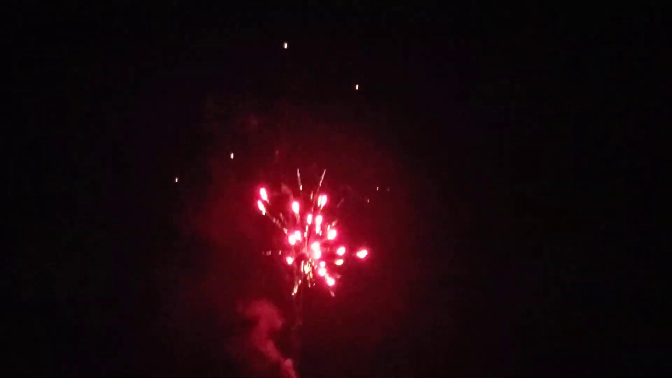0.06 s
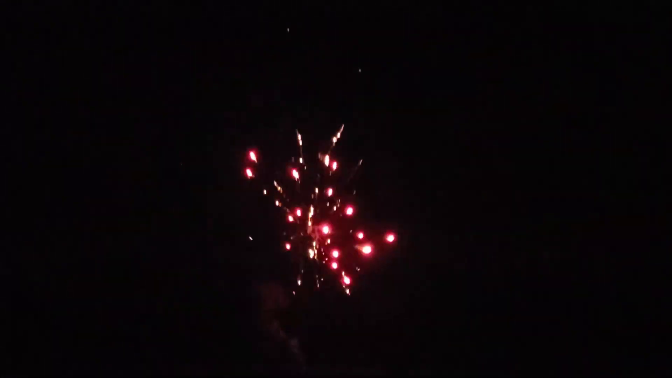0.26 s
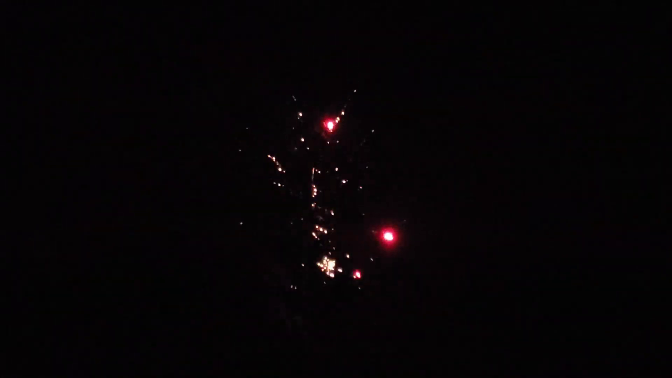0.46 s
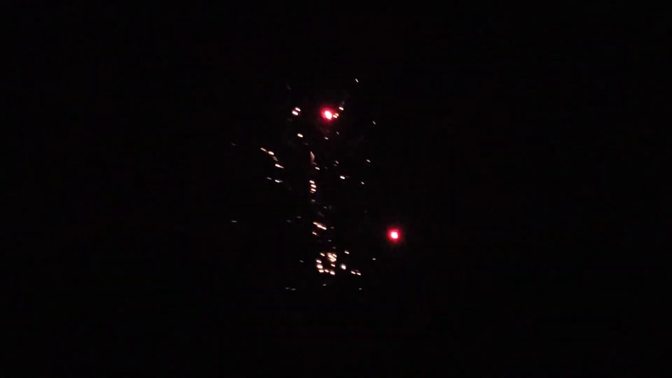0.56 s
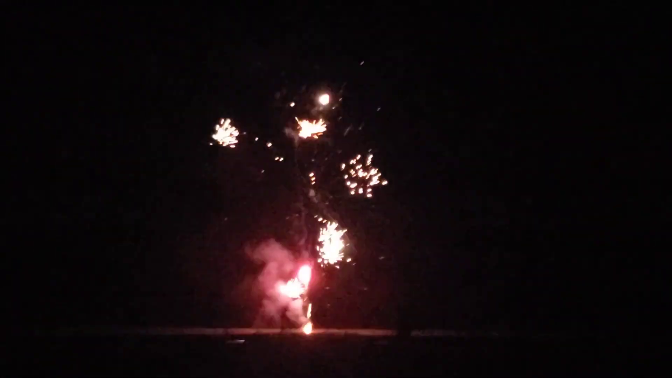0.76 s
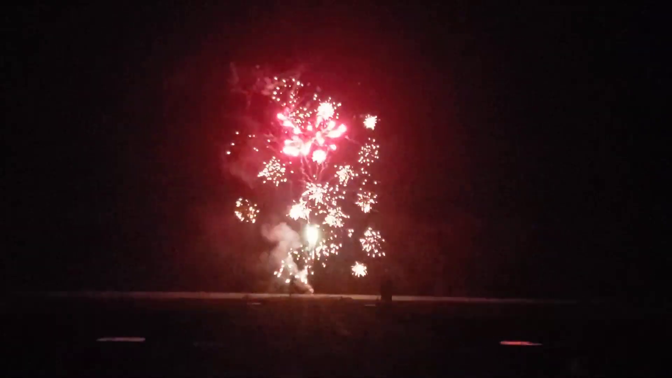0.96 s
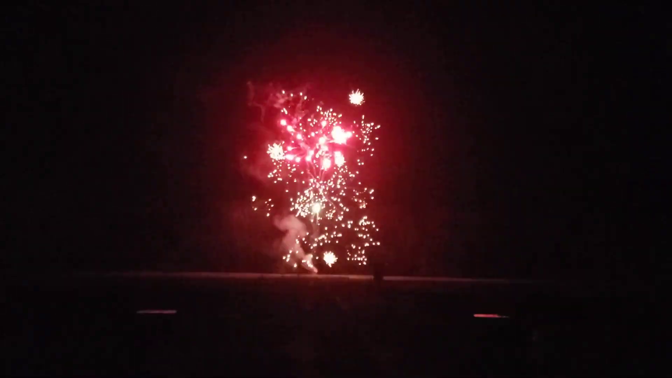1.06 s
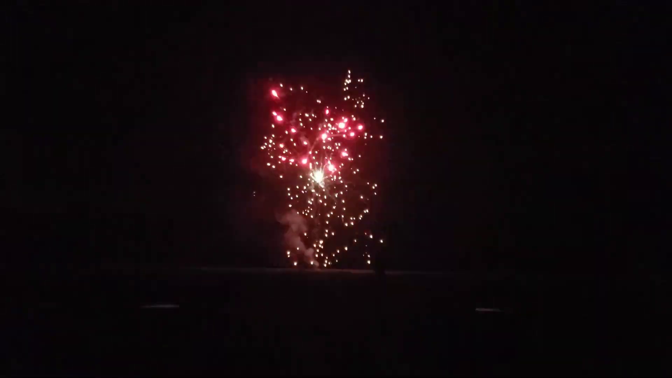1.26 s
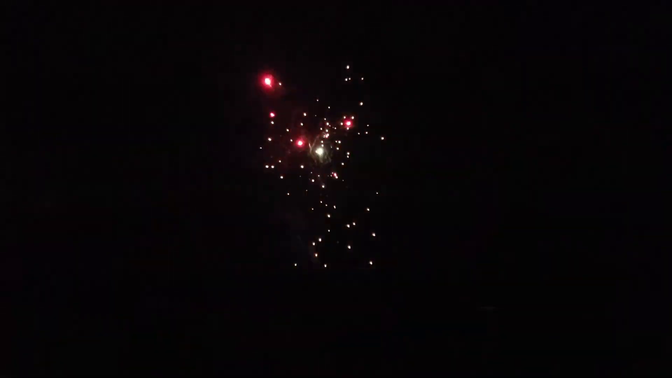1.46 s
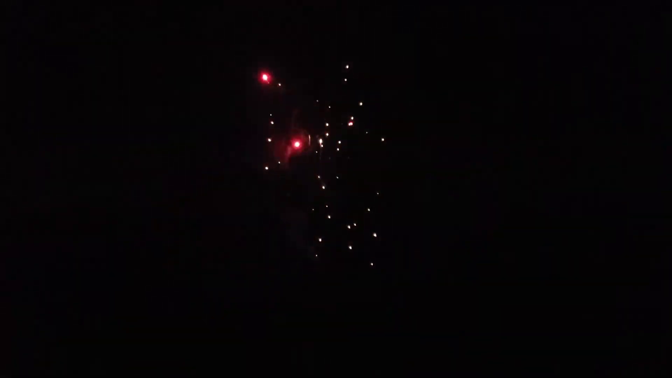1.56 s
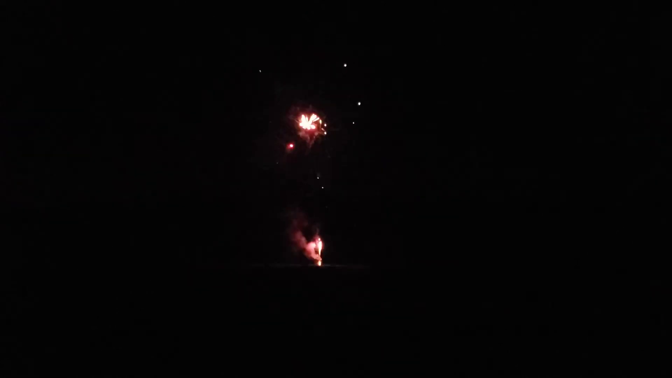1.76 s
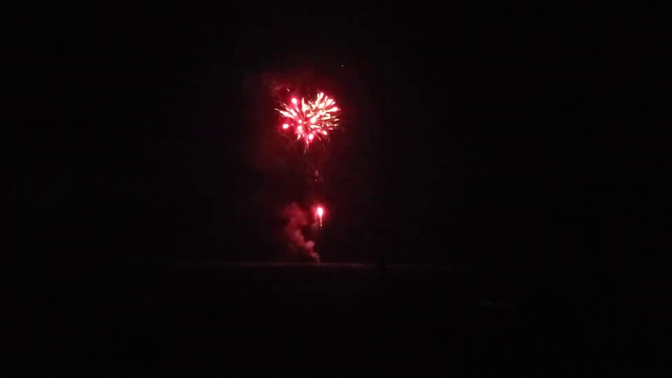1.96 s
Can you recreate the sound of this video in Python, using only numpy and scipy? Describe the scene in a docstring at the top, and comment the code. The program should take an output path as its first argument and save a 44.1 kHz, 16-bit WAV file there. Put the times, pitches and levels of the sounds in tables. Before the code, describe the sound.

Two sharp firework bangs about a second apart, each answered by a hissing wash from distant trees; the second leads into rapid dry crackling. Quiet night air, camera hiss, right channel distorting, left dull.

```python
"""Two shells bang, a lift charge thuds and crackling stars snap in a quick volley: small fireworks, open field, night.
Each report is a pressure spike arriving directly, off the ground and off nearby walls, with a short noise tail.
A third of a second after a bang, distant trees return it as a long hissing wash, made of shaped noise.
Soft low thuds, open air and a faint trill lie beneath, with the camera's own pulsing treble hiss.
The bangs overload the camera's right microphone; the left one is muffled."""
import sys
import numpy as np
from scipy import signal
from scipy.fft import rfft, irfft, next_fast_len
from scipy.io import wavfile
from scipy.ndimage import map_coordinates

SR = 44100
rng = np.random.default_rng(int(sys.argv[2]) if len(sys.argv) > 2 else 0)


def master_out(mix):
    """Clip the mix to full scale and print it as 16-bit PCM to the path in sys.argv[1]."""
    frames = np.transpose(np.atleast_2d(mix))
    ceiling = np.clip(frames, -1, 1)
    pcm = np.round(ceiling * 32767).astype(np.int16)
    wavfile.write(sys.argv[1], SR, pcm)


N = 88200
T = np.arange(N) / SR  # seconds

# Shell bursts: (time [s], level [dB], ground echo delay [ms], ground echo level [dB],
#                microphone thump level [dB], thump frequency [Hz])
SHELLS = [(0.2313, 3, 1.174, -6.5, -3, 57.6), (1.1563, 2, 2.6, -9.5, -10, 64)]
# Lift charge: (time [s], level [dB], ground echo delay [ms], ground echo level [dB])
LIFTS = [(1.0344, -15.5, 0.21, -9)]
# Crackling stars, and at 1.1696 s a strong wall echo of the second shell's bang:
# (time [s], level [dB], ground echo delay [ms], ground echo level [dB])
STARS_AND_ECHO = [(.1095, -10.5, 1.7, -11), (.5105, -27, .9, 2), (.842, -21, 1.2, -12),
                  (1.0669, -11.5, 1.38, -1.5), (1.1642, -14.5, 0.72, -12), (1.1696, -3, 1.1, -16),
                  (1.1816, -9.5, 1.2, -10), (1.2172, -16.5, 1.44, 8.5), (1.2221, -15.5, 1.93, 7),
                  (1.2497, -14, 0.73, 3), (1.2691, -8, 0.98, -5), (1.2739, -16.5, 0.99, -10),
                  (1.2791, -12, 1.05, -13), (1.2871, -10.5, 1.27, -11), (1.2892, -12.5, 1.6, -13),
                  (1.3223, -7.5, 1.45, -6), (1.3251, -16, 0.86, -8), (1.3323, -16, 2.1, 2),
                  (1.3399, -11, .8, -14), (1.3462, -14, 1.7, 4.5), (1.3572, -16, 2.04, 9),
                  (1.3661, -13, 1.12, 4.5), (1.3736, -12, 0.64, 0), (1.3897, -10.5, 1.35, -20),
                  (1.4056, -7, 1.6, -8), (1.4204, -13, 2.1, -1), (1.4301, -12.5, 1.43, 2.5),
                  (1.4394, -13.5, 1.2, 0), (1.4581, -9, 1.96, 1), (1.4868, -9.5, 1.65, -10),
                  (1.4972, -11.5, 2.2, 5.5), (1.508, -12.5, 1.7, -13)]
# Colour of each kind of report: (frequency [Hz], level [dB])
STAR_TONE = [(40, -17), (120, -7.5), (380, -3.5), (520, -10), (800, 5), (1150, 0), (1900, 1), (2400, 0.5),
             (3000, -4), (4200, 0.5), (5500, -7), (6600, -11), (8000, -28.5), (10000, -26), (15000, -32)]
SHELL_TONE = [(10, -61), (50, -24.5), (150, -2), (330, -3), (480, -3.5), (750, 2.5), (1100, -1.5),
              (1550, -9), (2000, -18.5), (3000, -14), (4300, -11.5), (5600, -13), (8000, -39), (10500, -32),
              (15000, -36)]
LIFT_TONE = [(10, -37), (40, -28), (90, -6), (220, 3), (380, -3), (700, -14), (1500, -17), (4300, -12.5),
             (6500, -21.5), (8000, -41), (10000, -30), (15000, -52)]
# Echoes off nearby walls: (delay [s], level [dB])
WALLS = [(0.012, -27.5), (0.0181, -13.5)]
# The trees' answer to a bang: (time after the bang [s], body level [dB], hiss level [dB])
TREES = [(.32, -26, -18), (0.335, -7.5, 9), (0.363, -7.5, 3.5), (.39, -8, -1.5), (.44, -0.5, 1.5),
         (.51, 0.5, 1.5), (.63, 0, -3.5), (.74, 1.5, -7.5), (.85, -4, -20), (1.1, -6, -21),
         (1.6, -36, -12.5)]
# What the trees answer, an earlier burst, both shells and the volley:
# (time [s], body level [dB], hiss level [dB]), added to the levels in TREES
ANSWERED = [(-0.6, -50.5, -50), (.2311, -38, -46), (1.1563, -40.5, -47), (1.33, -44.5, -53)]
# Colour of the trees' dull body and bright hiss: (frequency [Hz], level [dB])
TREE_BODY = [(50, -24), (160, -17.5), (300, -4.5), (550, -4.5), (800, 3.5), (1100, 1), (1700, -16),
             (3000, -17.5), (8000, -70)]
TREE_HISS = [(300, 1), (1300, -2.5), (2300, 3.5), (3100, -1.5), (4300, 1.5), (5700, -6), (7000, -13.5),
             (8000, -30.5), (10000, -22.5), (15000, -30)]
# Colour of the bright, short noise tail after each bang: (frequency [Hz], level [dB])
BRIGHT_TAIL = [(1000, -8), (2500, 2), (4500, 1), (6500, -2), (8000, -14), (10000, -12), (15000, -18)]
# Soft low echoes: (time [s], level [dB], pitch [Hz], time to fall 60 dB [s])
THUDS = [(-.004, -40.5, 270, 0.083), (0.379, -45.5, 115, 0.15), (.564, -43, 400, 0.23)]
# Colour of the steady outdoor air: (frequency [Hz], level [dB])
AIR = [(25, -8), (60, 3), (150, -7), (400, 1.5), (550, -4), (850, 4), (1200, -4), (1800, -5.5), (3000, -10),
       (4000, -8.5), (5500, -13), (7000, -24.5), (8000, -40), (15000, -31)]
# How alike diffuse sound is at the two microphones: (frequency [Hz], likeness [0 to 1])
ALIKE = [(60, 0.92), (140, 0.92), (300, 0.84), (700, 0.11), (1500, 0.082), (6000, .05)]
# Colour of the camera's electronic hiss: (frequency [Hz], level [dB])
SELF_NOISE = [(7500, -48), (9000, -25), (10500, -11), (11600, -12.5), (12300, 5), (13000, 3), (13600, -4),
              (14800, 0.5), (16000, -10.5)]
# Response of the muffled left microphone: (frequency [Hz], level [dB])
LEFT_MIC = [(60, -1), (200, -2.5), (500, -1.5), (800, -5.5), (1200, -1), (1800, -3.5), (2700, -13),
            (4200, -21), (6400, -22.5), (9000, -14.5), (12500, -19.5), (15000, -25)]

SCATTER_DB, SCATTER_T60_S = 0.5, 0.016  # things close to the camera smear each report
NEAR_DB, NEAR_T60_S = -15.5, 0.13  # the yard's short tail after a star
BOOM_DB, BOOM_T60_S, BOOM_HZ = -2, 0.11, 900  # the dull tail after a shell
# low swing of an overloaded microphone
THUMP_DELAY_S, THUMP_WIDTH_S, THUMP_Q, THUMP_LEFT_DB = 0.00073, 0.00087, 2.53, -14
BRIGHT_TAIL_DB, BRIGHT_TAIL_T60_S = -39, 0.3
AIR_DB = -50
INSECT_HZ, INSECT_WIDTH_HZ, INSECT_DB, INSECT_FADE_DB_PER_S = 3610, 79, -58, 18
SELF_NOISE_DB, BUZZ_HZ = -57, 62.925
# bursts of hiss: places and width as fractions of a cycle, and the steady part beside bursts of 1
BUZZ_PLACES, BUZZ_WIDTH, BUZZ_STEADY = (0.22, 0.63), 0.075, 0.35
LEFT_LAG_S, LOW_CUT_HZ, TOP_HZ = 0.0001, 21, 16100
CLIP_TOP = 1.3  # ceiling that an overloaded signal approaches


def amp(db):
    """Decibels to gain."""
    return 10 ** (np.asarray(db) / 20)


def along(points, hz):
    """Read (frequency, value) points on a log frequency axis."""
    f, v = np.transpose(points)
    return np.interp(np.log(hz + 1), np.log(f + 1), v)


def filtered(x, response):
    """Multiply the spectrum of x by a response of frequency."""
    m = next_fast_len(x.shape[-1] + SR // 4)
    spectrum = rfft(x, m) * response(np.fft.rfftfreq(m, 1 / SR))
    return irfft(spectrum, m)[..., :x.shape[-1]]


def causal(points, size=4096):
    """The sharpest causal impulse response of this colour (minimum phase)."""
    log_gain = np.log(amp(along(points, np.fft.rfftfreq(size, 1 / SR))))
    cepstrum = irfft(log_gain)
    cepstrum[1:size // 2] *= 2  # fold the time-reversed half forward
    cepstrum[size // 2 + 1:] = 0
    return irfft(np.exp(rfft(cepstrum)))[:size // 2]


def add(track, s, sound):
    """Mix a sound in at time s."""
    i = max(round(s * SR), 0)
    track[..., i:i + sound.shape[-1]] += sound[..., :N - i]


def rush(spectrum):
    """Diffuse stereo noise of rms 1, alike at both microphones in the bass."""
    def middle_and_side(hz):
        turn = np.arccos(np.clip(along(ALIKE, hz), -1, 1)) / 2
        return amp(along(spectrum, hz)) * [np.cos(turn), np.sin(turn)]

    mid, side = filtered(rng.standard_normal((2, N)), middle_and_side)
    pair = np.array([mid + side, mid - side])
    return pair / pair.std()


def wobble(rate):
    """A smooth random curve, rate knots a second."""
    knots = rng.standard_normal(int(N * rate / SR) + 4)
    return map_coordinates(knots, [T * rate])


def tail(t60, rise_s, channels=2):
    """Dying noise scatter, of energy about 1 in each channel."""
    t = T[:SR // 4]
    env = amp(-60 * t / t60) * (1 - np.exp(-(t / rise_s) ** 2))
    return rng.standard_normal((channels, len(t))) * env / np.linalg.norm(env)


def decay(s, t60):
    """A quick rise at time s, then a steady fall in decibels."""
    t = np.maximum(T - s, 0)
    return (1 - np.exp(-t / 0.0015)) * amp(-60 * t / t60)


def reports(rows, tone, scatter_db, tail_db, tail_t60, tail_hz):
    """Pressure spikes, each with its ground echo, wall echoes, close scatter and a tail of its own."""
    out, spike = np.zeros((2, N)), causal(tone)
    for s, db, ground_ms, ground_db, *_ in rows:
        wide_tail = tail(tail_t60, 0.0064)
        path = amp(tail_db) * filtered(wide_tail, lambda hz: 1 / (1 + (hz / tail_hz) ** 2))
        path += amp(scatter_db) * tail(SCATTER_T60_S, 0.001, channels=1)
        # the direct arrival, then the walls; each brings its own ground echo
        for delay, arrival_db in [(0.00014, 0)] + WALLS:
            path[:, round(delay * SR)] += amp(arrival_db)
            path[:, round((delay + ground_ms / 1000) * SR)] += amp(arrival_db + ground_db)
        add(out, s, amp(db) * path)
    return signal.fftconvolve(out, spike[None] / spike.max(), axes=1)[:, :N]


def thumps():
    """Each shell kicks the overloaded microphone off centre; it swings back in a cycle or two."""
    out = np.zeros(N)
    for s, *_, db, hz in SHELLS:
        kick = -amp(db) * np.exp(-((T - s - THUMP_DELAY_S) / THUMP_WIDTH_S) ** 2)
        # a resonant second-order high-pass
        out += filtered(kick, lambda f: -f ** 2 / (hz ** 2 - f ** 2 + 1j * f * hz / THUMP_Q))
    return np.array([amp(THUMP_LEFT_DB) * out, out])


def bright_tail():
    """A bright, short noise tail after each bang: shaped noise under a quick rise and steady fall."""
    envelope = sum(decay(shell[0], BRIGHT_TAIL_T60_S) for shell in SHELLS)
    return amp(BRIGHT_TAIL_DB) * envelope * rush(BRIGHT_TAIL)


def trees():
    """Countless small distant echoes of each burst: a bright front, then a duller, grainy swell."""
    after, *shapes = np.transpose(TREES)
    times, *levels = np.transpose(ANSWERED)

    def envelope(shape, level):
        # the answers add as power; each is silent until its echo returns
        answers = [amp(db + np.interp(T - s, after, shape, left=-120)) for s, db in zip(times, level)]
        return np.sqrt(sum(answer ** 2 for answer in answers))

    body, hiss = [envelope(shape, level) for shape, level in zip(shapes, levels)]
    # the random curves, in dB, give the grain
    dull = body * amp(1.34 * wobble(59.56)) * rush(TREE_BODY)
    bright = hiss * amp(1.26 * wobble(500)) * rush(TREE_HISS)
    return dull + bright


def thuds():
    """Dull echoes from the surroundings: dying noise in a narrow band around each pitch."""
    out = np.zeros((2, N))
    for s, db, hz, t60 in THUDS:
        band = [(hz / 4, -40), (hz / 1.2, -8), (hz, 0), (hz * 1.3, -8), (hz * 4, -35), (hz * 16, -90)]
        out += amp(db) * decay(s, t60) * rush(band)
    return out


def night():
    """Open air as steady noise, and a faint narrow trill that fades, probably an insect."""
    noise = rng.standard_normal((2, N))
    trill = filtered(noise, lambda hz: np.exp(-((hz - INSECT_HZ) / INSECT_WIDTH_HZ) ** 2))
    trill_gain = amp(INSECT_DB - INSECT_FADE_DB_PER_S * T)
    return amp(AIR_DB) * rush(AIR) + trill_gain * trill / trill.std()


def buzz():
    """The camera's thin treble hiss, pulsing twice in every cycle."""
    cycle = T * BUZZ_HZ % 1
    gate = BUZZ_STEADY + sum(np.exp(-((cycle - place) / BUZZ_WIDTH) ** 4) for place in BUZZ_PLACES)
    return amp(SELF_NOISE_DB) * gate / np.sqrt(np.mean(gate ** 2)) * rush(SELF_NOISE)


def scene():
    """Shells, lift charge, stars and a strong wall echo over the distant wash and the night air."""
    shells = reports(SHELLS, SHELL_TONE, scatter_db=-3.5,
                     tail_db=BOOM_DB, tail_t60=BOOM_T60_S, tail_hz=BOOM_HZ)
    lifts = reports(LIFTS, LIFT_TONE, scatter_db=-1, tail_db=-24, tail_t60=0.1, tail_hz=3000)
    stars_and_echo = reports(STARS_AND_ECHO, STAR_TONE, scatter_db=SCATTER_DB,
                             tail_db=NEAR_DB, tail_t60=NEAR_T60_S, tail_hz=12100)
    return shells + lifts + stars_and_echo + thumps() + bright_tail() + trees() + thuds() + night()


def record(dry):
    """Electronic buzz, a muffled and late left microphone, low cut, overload and the band limit."""
    left, right = dry + buzz()
    muffled = signal.fftconvolve(left, causal(LEFT_MIC))[:N]
    left = filtered(muffled, lambda hz: np.exp(-2j * np.pi * hz * LEFT_LAG_S))  # a pure delay
    pair = filtered(np.array([left, right]), lambda hz: 1j * hz / (1j * hz + LOW_CUT_HZ))
    pair = pair / (1 + (pair / CLIP_TOP) ** 4) ** (1 / 4)  # overload flattens the loudest peaks
    return filtered(pair, lambda hz: hz < TOP_HZ)


dry = scene()
out = record(dry)
master_out(out)
```